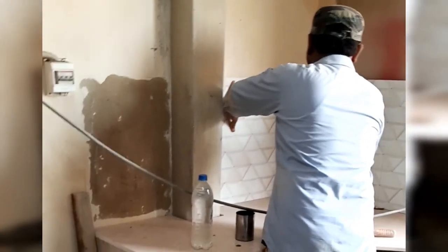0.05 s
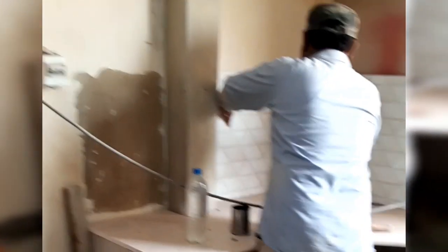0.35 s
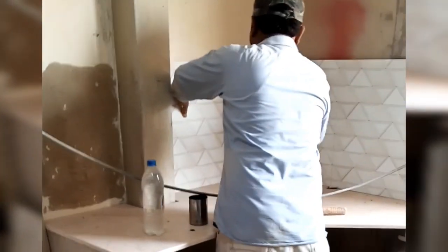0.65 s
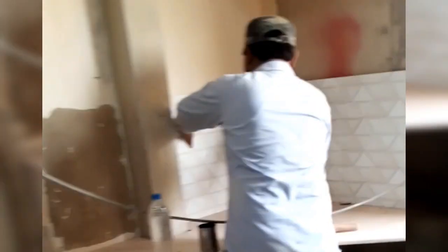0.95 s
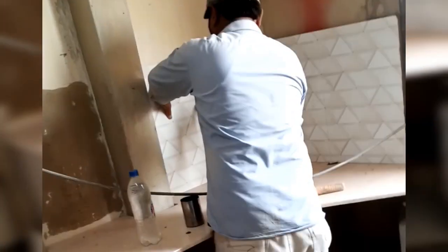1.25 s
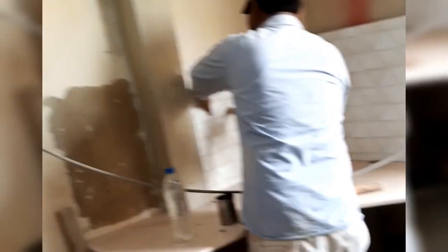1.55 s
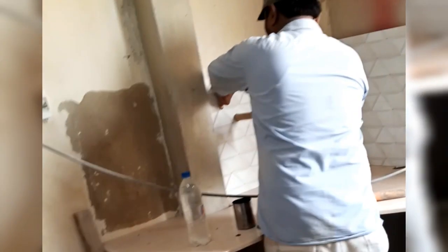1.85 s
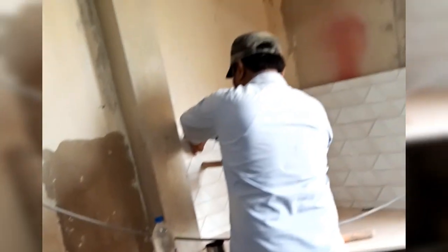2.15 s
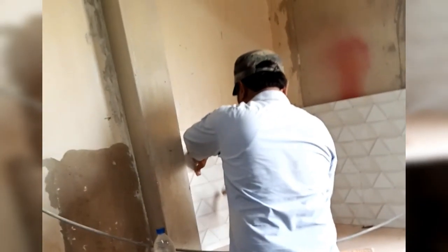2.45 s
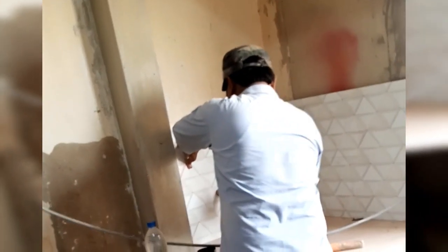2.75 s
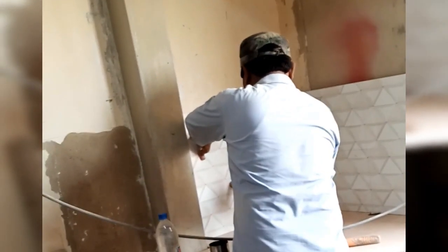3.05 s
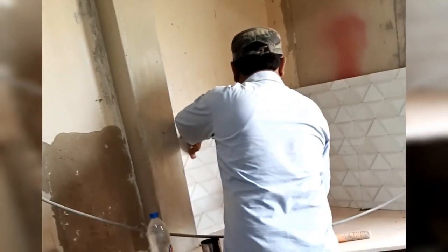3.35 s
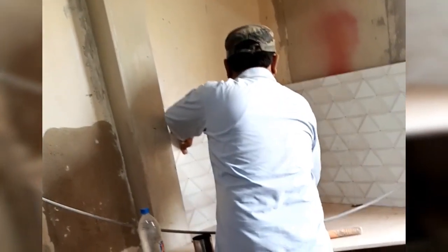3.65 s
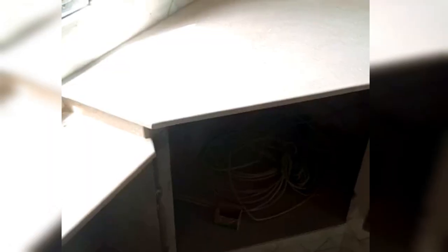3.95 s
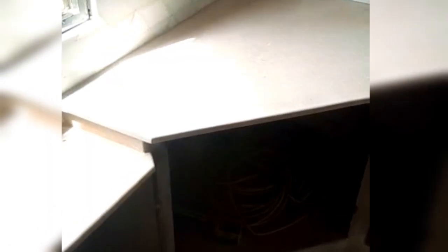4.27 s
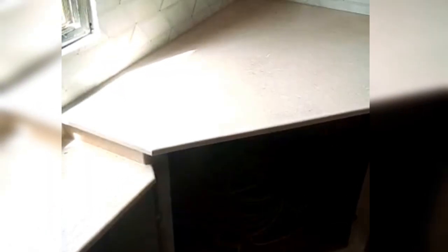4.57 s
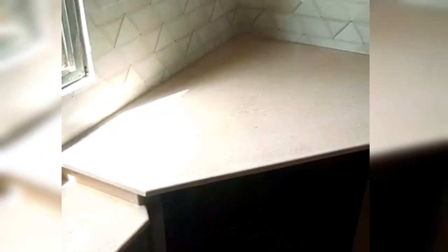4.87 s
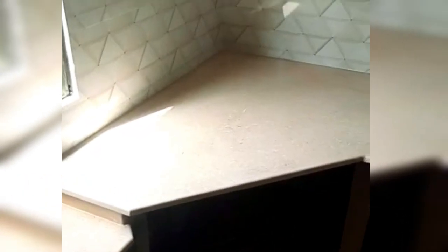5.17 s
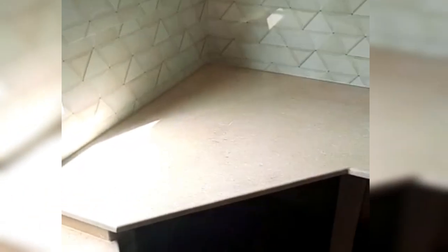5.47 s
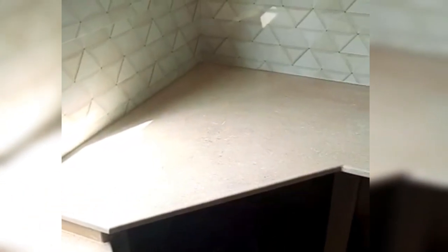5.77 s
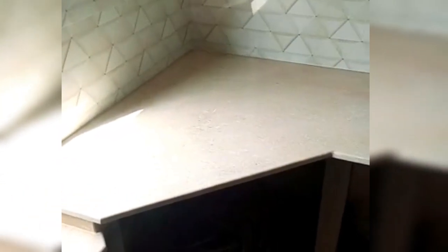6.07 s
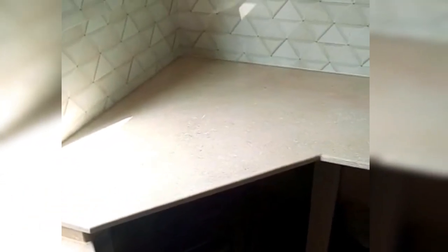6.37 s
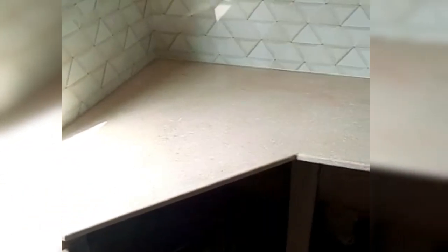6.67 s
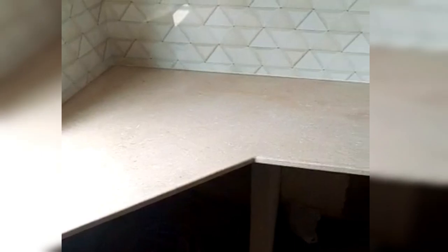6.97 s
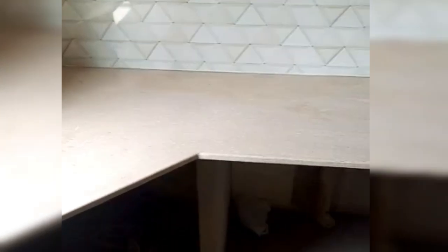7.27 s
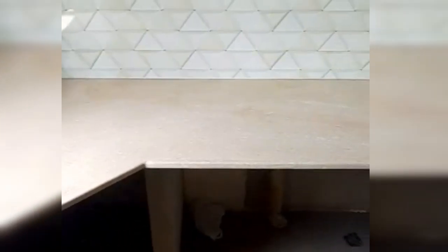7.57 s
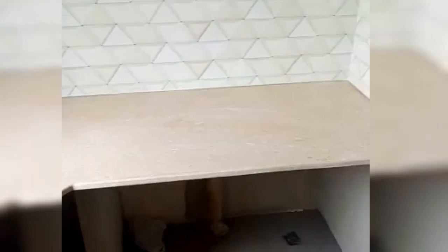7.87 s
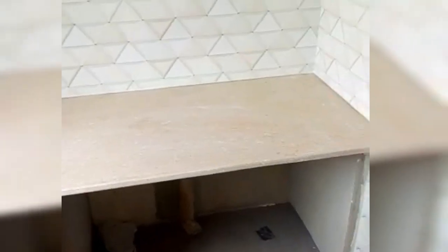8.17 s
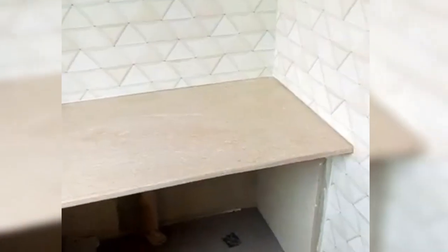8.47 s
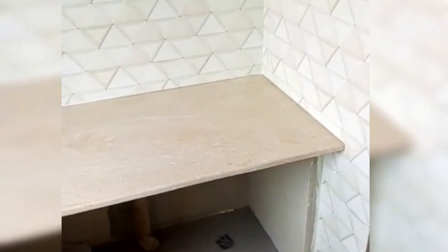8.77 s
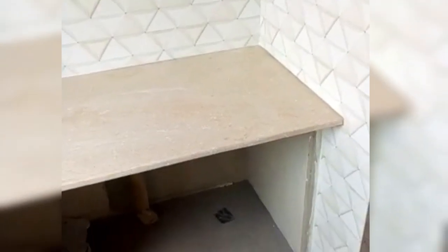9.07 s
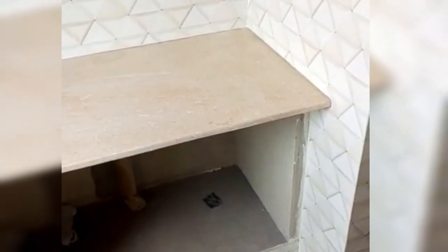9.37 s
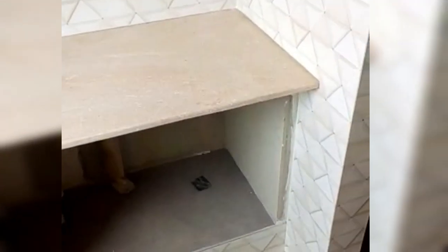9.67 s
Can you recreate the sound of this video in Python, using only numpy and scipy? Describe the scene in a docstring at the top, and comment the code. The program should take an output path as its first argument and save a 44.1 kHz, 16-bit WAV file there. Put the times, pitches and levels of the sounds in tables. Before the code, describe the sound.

Ten low, hollow knocks on a tile echo through an unfinished kitchen, followed by a quiet wash of street traffic and far horns.

```python
"""A bare, echoing kitchen, the microphone indoors, the street beyond the window.
Ten soft blows thump a wall tile into its mortar bed; each rings the tile and sets the room booming.
Cloth rustles close to the microphone. The sound breaks off in the last blow and fades in again
on the empty room: a wash of traffic, a droning engine, far horns, thin squeaks, a few light scuffs."""
import sys
import numpy as np
from scipy import signal
from scipy.fft import rfft, irfft, next_fast_len
from scipy.io import wavfile
from scipy.ndimage import uniform_filter1d, minimum_filter1d

SR = 44100
rng = np.random.default_rng(int(sys.argv[2]) if len(sys.argv) > 2 else 0)


def store_wav(level_fs):
    """Save 16-bit WAV to argv[1]."""
    pcm = np.round(np.clip(np.atleast_2d(level_fs), -1, 1) * 32767)
    wavfile.write(sys.argv[1], SR, pcm.T.astype(np.int16))


N = 433062
TIME = np.arange(N) / SR
CUTOFF_HZ = 15800

# Blows at the kitchen wall, after one still echoing at 0 s: (time [s], level [dB], hollow ring [Hz],
# ring lift [dB], boom [dB], deep thud [dB], hollow clack [dB], dry knock [dB], edge clack [dB])
BLOWS = [(-0.21, -16.5, 364, 3.5, 3, -5.5, -2.5, -3.5, 3), (0.224, -15.5, 420, 6, 1.5, -6, 1.5, -2, 1.5),
         (0.520, -18, 460, 9, 2, -3.5, 0, -5, 0.5), (0.847, -16.5, 449, 6.5, -1, 0, 1, -2.5, -6),
         (1.128, -17, 554, 1.5, -1, 1, 4.5, -1.5, -4), (1.415, -17, 560, 2, -1.5, 2, -1, 1.5, -2.5),
         (1.778, -17.5, 503, 3, -1, 1.5, 2.5, -1.5, -5), (2.086, -18.5, 389, 3, -5, 0.5, 2, 2, -2),
         (2.693, -17.5, 380, 4.5, 0.5, 2.3, 1, 1, -2.5), (3.012, -19.5, 355, 4.5, 6, 1, 1.5, 2, -6),
         (3.605, -16.5, 301, 5, -4.5, -1.5, -1, -2, 0.5)]
# The five registers a blow stresses, boom to edge clack: (low edge [Hz], high edge [Hz])
REGISTERS = [(80, 144), (150, 195), (490, 590), (680, 1240), (2200, 6100)]
# Broad ceramic resonances that colour the echoes: (centre [Hz], width [Hz], lift [dB])
CERAMIC = [(900, 120, 3.5), (1890, 390, 3.5), (3230, 320, 4)]
def tile_blows(room_db=-3, corner_db=2.0, corner_s=0.011, crack_db=-21.5, travel_s=(0.23, 1.465)):
    """Each blow rings the tile and the room; neighbouring places on the tile sound alike."""
    t = np.arange(3 * SR // 2) / SR
    corner = 1 + from_db(corner_db) * np.exp(-t / corner_s)   # the corner strengthens the first echoes
    thuds = [from_db(room_db) * corner * room_thud(t) for _ in range(3)]
    boom = low_boom(t)
    out = np.zeros(N)
    for s, db, ring_hz, ring_db, *stresses_db in BLOWS:
        place = np.interp(s, travel_s, [0, 2])   # the blows work across the tile, then stay put
        shares = np.maximum(1 - abs(np.arange(len(thuds)) - place), 0)
        echoes = np.sqrt(shares) @ thuds + from_db(crack_db + stresses_db[-1]) * crack(t)
        for hz, width_hz, lift_db in CERAMIC:
            echoes = lift(echoes, hz - width_hz / 2, hz + width_hz / 2, lift_db)
        blow = boom + echoes + tile_ring(t, place)
        blow = lift(blow, ring_hz * 0.75, ring_hz * 1.063, ring_db)
        for (low_hz, high_hz), stress_db in zip(REGISTERS, stresses_db):
            blow = lift(blow, low_hz, high_hz, stress_db)
        add(out, s, from_db(db) * blow)
    return out


# The tile's modes at the last place struck: (frequency [Hz], relative level [dB], t60 [s])
TILE_MODES = [(300, -1.5, 0.019), (397, -1, 0.056), (516, -8, 0.092), (760, -12.5, 0.072), (997, -9, 0.078),
              (1747, -25.5, 0.26), (2123, -24.5, 0.14), (2727, -25.5, 0.12), (3480, -24.5, 0.11),
              (3930, -40, 0.27)]
# Paths to the microphone, direct, then off corner and far walls: (delay [s], gain [dB], top [Hz])
ARRIVALS = [(0.0, 0, 6000), (0.0052, -3, 3020), (0.021, -13, 1500), (0.044, -8.5, 900), (0.071, -1, 700),
            (0.104, -11, 900)]
def tile_ring(t, place, stiffening=0.0396, radiate_hz=190, soft_hz=4200):
    """Mortar damps the ring; a small plate radiates no deep bass and a soft blow excites no top."""
    early = sum(from_db(db) * butter(ringing(TILE_MODES, np.maximum(t - delay, 0)), top_hz, "low")
                for delay, db, top_hz in ARRIVALS)
    pace = 1 + stiffening * (2 - place)   # the mortar grips differently from place to place
    ring = np.interp(pace * t, t, early)
    return butter(ring, [radiate_hz, soft_hz], "band", order=4)


def crack(t, band_hz=(750, 2700), top_hz=5500, t60=0.32, snap_db=-1.0, snap_s=0.0086):
    """The hard edge of a blow: a brief snap, then its scatter off the nearby walls and worktop."""
    scatter = butter(rng.standard_normal(len(t)), band_hz, "band")
    snap = 1 + from_db(snap_db) * np.exp(-t / snap_s)
    return rms_one(butter(scatter, top_hz, "low", order=4)) * snap * from_db(-60 * t / t60)


# Standing waves between the kitchen walls: (frequency [Hz], relative level [dB], t60 [s])
WALL_MODES = [(90.3, -26, 2.5), (114.4, -21, 1.6), (149.3, -15, 1.9), (163.3, -7.8, 1.25),
              (178.3, -8.2, 1.3), (186.8, -8.5, 0.8), (211.3, -9.5, 1.45), (302, -17, 0.8),
              (328, -13, 0.85), (361, -12, 1.0), (424, -11, 0.9), (492, -20, 0.7), (514, -19, 0.7),
              (539, -18.5, 0.8), (560, -19.5, 0.8), (580, -22, 0.7), (719, -25, 0.7)]
# The whole tile bouncing on wet mortar: (frequency [Hz], relative level [dB], t60 [s])
BOUNCE_MODES = [(185.35, -0.5, 0.46), (250, 2, 0.049)]
def low_boom(t, low_hz=88):
    """Tile and room swing together; close low modes beat, so each thud throbs as it dies."""
    return butter(swinging(WALL_MODES, t) + swinging(BOUNCE_MODES, t), low_hz, "high", order=3)


# Tile on mortar, heard across the room: (frequency [Hz], relative density [dB])
THUD_SPECTRUM = [(40, -44), (75, -30.5), (122, -23.5), (190, -15.5), (250, -2.5), (350, 2.5), (490, -4.5),
                 (700, -8), (1000, -17), (1400, -23), (2000, -22.5), (2600, -31), (3500, -33.5),
                 (6000, -49.5), (12000, -89)]
# Ring time of the bare kitchen: (frequency [Hz], t60 [s])
KITCHEN_DECAY = [(100, 3.7), (180, 2.1), (350, 1.294), (700, 0.97), (2000, 1.19), (5000, 1.2),
                 (12000, 0.35)]
# Echoes filling the room, the midrange last: (frequency [Hz], rise time [s])
BLOOM = [(150, 0.012), (260, 0.01), (400, 0.038), (650, 0.022), (1200, 0.019), (2500, 0.008)]
def room_thud(t):
    """One place on the tile heard through the room: dense echoes build up and die band by band."""
    edges = 35 * 2 ** (np.arange(27) / 3)   # third octaves
    out, power = 0, 0
    for low, high in zip(edges, edges[1:]):
        hz = np.sqrt(low * high)
        decay = from_db(-60 * t / at_hz(KITCHEN_DECAY, hz))
        bloom = 1 - np.exp(-t / at_hz(BLOOM, hz))
        band = butter(rng.standard_normal(len(t)) * decay, [low, high], "band")
        gain = from_db(at_hz(THUD_SPECTRUM, hz)) * np.sqrt(high - low)
        out = out + gain * rms_one(band) * np.sqrt(np.mean(decay ** 2)) * bloom
        power += gain ** 2
    return out / np.sqrt(power)


# Cloth brushing close to the microphone: (peak time [s], level [dB], rise time [s])
BRUSHES = [(0.407, -43, 0.024), (0.462, -37, 0.03), (0.662, -42.5, 0.1)]
# Its hiss at close range: (frequency [Hz], relative density [dB])
CLOTH_SPECTRUM = [(1500, -30.5), (3000, 4), (4500, 6), (6500, 4.5), (8500, -8), (12000, -18.5),
                  (15500, -15.5)]
def cloth_rustle(hold_s=0.027, fall_db_per_s=146, grain_db=1.5):
    """Each brush swells and dies away; fibres catch and slip, so the hiss is grainy."""
    power = 0
    for s, db, rise_s in BRUSHES:
        swell = np.clip(1 + (TIME - s) / rise_s, 0, 1)
        fall_db = fall_db_per_s * np.maximum(TIME - s - hold_s, 0)
        power = power + (swell * from_db(db - fall_db)) ** 2
    return np.sqrt(power) * from_db(grain_db * drift(70)) * noise(CLOTH_SPECTRUM)


# Light scuffs, sharp ticks, one dull bump, and a faint click as the sound breaks off:
# (time [s], level [dB], centre [Hz], half-width [octaves], length [s])
SCUFFS = [(1.415, -69, 11800, 0.46, 0.016), (2.688, -40, 47.5, 0.81, 0.03),
          (2.696, -54, 12030, 0.2, 0.0016), (3.015, -55, 11800, 0.25, 0.0014),
          (3.7, -49, 11000, 0.61, 0.00073), (4.25, -57, 5360, 0.22, 0.035), (5.193, -49, 1900, 1.26, 0.19),
          (7.476, -44.5, 730, 0.72, 0.11), (8.12, -65, 6500, 0.38, 0.05), (8.285, -56, 6000, 0.44, 0.05),
          (8.355, -56.5, 6000, 0.44, 0.06), (8.432, -54, 5940, 0.36, 0.055), (9.483, -58, 6300, 0.06, 0.11)]
def scuffs(tail_db=-13, tail_s=0.037, full_tail_s=0.04, grain_db=0.5):
    """Short, grainy swells of noise with a faint tail, which the briefest hardly excite."""
    t, out = np.arange(SR) / SR, np.zeros(N)
    for s, db, hz, octaves, length_s in SCUFFS:
        band_hz = [hz * 2 ** -octaves, min(hz * 2 ** octaves, CUTOFF_HZ)]
        band = rms_one(butter(rng.standard_normal(len(t)), band_hz, "band", order=3))
        age = 2 * t / length_s
        swell = age * np.exp(1 - age)
        tail_gain = from_db(tail_db) * np.sqrt(min(length_s / full_tail_s, 1))
        tail = tail_gain * np.exp(-t / tail_s) * (1 - np.exp(-age))
        add(out, s, from_db(db) * (swell + tail) * band)
    return out * from_db(grain_db * drift(60))


# An engine outside, surging three times: (peak time [s], level [dB], rise and ebb [s], firing [Hz])
ENGINE_SURGES = [(4.1, -41.5, 0.18, 118), (5.22, -41.5, 0.19, 114.6), (6.97, -41, 0.58, 122)]
def engine(unsteady=0.0251, throb_db=1.0, octave_db=-18):
    """Only the unsteady firing note and a trace of its octave get through the walls."""
    surges = [from_db(db) / np.cosh((TIME - s) / ebb_s) for s, db, ebb_s, _ in ENGINE_SURGES]
    firing_hz = in_time(ENGINE_SURGES) * (1 + unsteady * drift(18.3))
    phase = 2 * np.pi * np.cumsum(firing_hz) / SR
    drone = np.sin(phase) + from_db(octave_db) * np.sin(2 * phase)
    return np.sqrt(2) * np.max(surges, axis=0) * from_db(throb_db * drift(2.8)) * drone


# Horns far off in the street: (start [s], end [s], pitch [Hz], bend [Hz], level [dB])
HORNS = [(4.05, 4.6, 1314, 3, -57), (4.4, 5.0, 816, 2, -55.5), (4.45, 5.0, 1378, 3, -59),
         (5.08, 5.62, 975, 42, -45), (5.28, 6.25, 817, 3, -48.3), (5.85, 6.28, 1315, 4, -55),
         (6.2, 6.6, 970, 4, -56), (6.88, 7.14, 550, 4, -52), (8.2, 8.48, 1905, 5, -57),
         (8.45, 10.2, 813, 1, -51)]
# Faint thin squeaks from outside: (start [s], end [s], pitch [Hz], bend [Hz], level [dB])
SQUEAKS = [(4.48, 5.2, 5205, 15, -66), (4.7, 4.95, 5205, 30, -63), (7.05, 7.8, 5290, 6, -66),
           (9.47, 9.7, 6100, 70, -63), (9.58, 9.98, 2980, 12, -57)]
def far_tones(rows, waver_hz, scatter=0.36, swell_power=0.35, smear=0.21):
    """Tones swell and bend; their many paths between the houses make them flutter and blur."""
    out, wander = np.zeros(N), drift(27.7)
    in_phase, quadrature = 1 + scatter * drift(13.0), scatter * drift(18)
    for start, end, hz, bend_hz, db in rows:
        span = (TIME > start) & (TIME < end)
        arch = abs(np.sin(np.pi * (TIME[span] - start) / (end - start)))
        pitch_hz = hz + bend_hz * arch + np.hypot(waver_hz, smear * bend_hz) * wander[span]
        phase = 2 * np.pi * np.cumsum(pitch_hz) / SR
        tone = in_phase[span] * np.sin(phase) + quadrature[span] * np.cos(phase)
        out[span] += from_db(db) * arch ** swell_power * tone
    return out / np.sqrt(1 + 2 * scatter ** 2)


# Far traffic as it enters the empty room: (frequency [Hz], relative density [dB])
STREET_SPECTRUM = [(25, -16.5), (78, -19.5), (100, -8), (130, -7.5), (160, -7), (240, -11), (400, -11.5),
                   (600, -14.5), (900, -13.5), (1300, -15), (1550, -20), (1900, -20.5), (3600, -31),
                   (6600, -34.5), (8300, -46.5), (10000, -62), (15500, -74)]
# Borders between its rumble, body, tyre roar and rush: (frequency [Hz])
STREET_SPLITS_HZ = [316, 877, 1870]
# Standing waves that the traffic keeps droning indoors: (centre [Hz], width [Hz], lift [dB])
ROOM_DRONES = [(56, 5, 7), (102.5, 4.3, 8.5), (118.7, 5.1, 4.5), (128.6, 4.8, 6.5), (156, 5.3, 9.5),
               (167, 5.5, 2), (193.7, 5.3, 5), (207, 5, 3), (226.6, 5.1, 9.5), (245.4, 4.4, 8.5),
               (262.4, 4.5, 7.5), (302, 12, 4.5), (382, 11.4, 5)]
# The deepest rumble, ebbing as the engine leaves: (time [s], lift [dB])
RUMBLE_LIFT = [(4.5, -0.5), (5.5, 2), (7.4, 0.5), (8.2, -3.5), (9.8, -1)]
# Thin hiss above the traffic, growing towards the end: (time [s], level [dB])
TRAFFIC_HISS = [(7.9, -57), (8.8, -54.5)]
def traffic(level_db=-38.5, rumble_top_hz=135, hiss_from_hz=3500, surge_db=0.5, wander_db=0.35):
    """A gently surging wash through the window; each register wanders and the room drones along."""
    rest, wash = noise(STREET_SPECTRUM), 0
    for hz in STREET_SPLITS_HZ:
        low, rest = (butter(butter(rest, hz, kind), hz, kind) for kind in ("low", "high"))
        wash = wash + low * from_db(wander_db * drift(9.3))
    wash = wash + rest * from_db(wander_db * drift(1.5))
    for hz, width_hz, lift_db in ROOM_DRONES:
        wash = lift(wash, hz - width_hz / 2, hz + width_hz / 2, lift_db)
    wash = wash + (from_db(in_time(RUMBLE_LIFT)) - 1) * butter(wash, rumble_top_hz, "low", order=1)
    roar = rms_one(butter(wash, hiss_from_hz, "low", order=4))
    hiss = rms_one(butter(noise(STREET_SPECTRUM), hiss_from_hz, "high", order=4))
    return from_db(level_db + surge_db * drift(5.5)) * roar + from_db(in_time(TRAFFIC_HISS)) * hiss


# The street, well behind the tiling: (frequency [Hz], relative density [dB])
ROOM_TONE_SPECTRUM = [(25, -26), (60, -11), (110, 6), (250, -1.5), (500, -6), (1000, -7), (2100, -9.5),
                      (3500, -15), (6500, -25.5), (8200, -39), (11000, -43.5), (15000, -57)]
def room_tone(level_db=-41):
    """Steady street noise fills the kitchen between the blows."""
    return from_db(level_db) * noise(ROOM_TONE_SPECTRUM)


# The microphone's noise floor: (frequency [Hz], relative density [dB])
MIC_SPECTRUM = [(1000, -19), (14000, -17), (14700, 9), (15800, -0.5)]
def mic_hiss(level_db=-79):
    """The microphone's own faint hiss, strongest at the very top."""
    return from_db(level_db) * noise(MIC_SPECTRUM)


def from_db(db):
    """Decibels to gain."""
    return 10 ** (np.asarray(db) / 20)


def rms_one(x):
    """Scale to rms 1."""
    return x / np.sqrt(np.mean(x ** 2) + 1e-20)


def in_time(rows):
    """A timed table's last column at every sample."""
    columns = np.transpose(rows)
    return np.interp(TIME, columns[0], columns[-1])


def at_hz(points, hz):
    """Read a curve on a log-frequency axis."""
    points_hz, values = np.transpose(points)
    return np.interp(np.log(hz), np.log(points_hz), values)


def butter(x, hz, kind, order=2):
    """Causal Butterworth filter."""
    return signal.sosfilt(signal.butter(order, hz, kind, fs=SR, output="sos"), x)


def lift(x, low_hz, high_hz, db):
    """Raise or lower one band."""
    return x + (from_db(db) - 1) * butter(x, [low_hz, high_hz], "band", order=1)


def add(out, s, sound):
    """Mix a sound in from time s."""
    start = round(s * SR)
    sound = sound[max(-start, 0):N - start]
    out[max(start, 0):max(start, 0) + len(sound)] += sound


def drift(rate_hz):
    """Smooth random wander of rms 1, mostly slower than rate_hz."""
    step, settle = 40, 2000
    pole = np.exp(-2 * np.pi * rate_hz * step / SR)
    white = rng.standard_normal(N // step + settle + 2)
    slow = signal.lfilter([1], [1, -2 * pole, pole * pole], white)[settle:]
    return np.interp(np.arange(N) / step, np.arange(len(slow)), rms_one(slow))


def noise(spectrum):
    """Steady noise of a given colour, rms 1."""
    size = next_fast_len(N, True)
    hz = np.maximum(np.fft.rfftfreq(size, 1 / SR), 1)
    coloured = rfft(rng.standard_normal(size)) * from_db(at_hz(spectrum, hz))
    return rms_one(irfft(coloured, size)[:N])


def ringing(modes, t):
    """Decaying sines set off by one blow."""
    return sum(from_db(db - 60 * t / t60) * np.sin(2 * np.pi * hz * t) for hz, db, t60 in modes)


def swinging(modes, t):
    """Modes set off by one blow, neighbours swinging opposite ways."""
    return ringing(modes[::2], t) - ringing(modes[1::2], t)


def scene(break_s=3.719, fade_out_s=0.0027, resume_s=3.812, fade_in_s=0.17, floor_db=-70):
    """One microphone in the kitchen: the tiling, a moment of near silence, then the quiet room."""
    small_sounds = scuffs() + mic_hiss()
    tiling = tile_blows() + cloth_rustle() + room_tone() + small_sounds
    outside = traffic() + engine() + far_tones(HORNS, waver_hz=2.1) + far_tones(SQUEAKS, waver_hz=21.9)
    fade_out = np.clip((break_s - TIME) / fade_out_s, from_db(floor_db), 1)
    fade_in = 1 - np.exp(-np.maximum(TIME - resume_s, 0) / fade_in_s)
    return (tiling * fade_out + (outside + small_sounds) * fade_in)[None]


def record(dry, threshold_db=-12.5, release_db_per_s=150):
    """A fast limiter on the short-term power flattens the start of each blow; the top is cut."""
    power = np.maximum(uniform_filter1d(dry[0] ** 2, size=300), 1e-12)
    over_db = np.maximum(10 * np.log10(power) - threshold_db, 0)
    release_db = release_db_per_s * TIME
    held_db = np.maximum.accumulate(over_db + release_db) - release_db
    gain_db = uniform_filter1d(minimum_filter1d(-held_db, size=200), size=200)
    top_cut = signal.ellip(10, 0.1, 90, CUTOFF_HZ, fs=SR, output="sos")
    return signal.sosfilt(top_cut, dry * from_db(gain_db))


dry = scene()
out = record(dry)
store_wav(out)
```